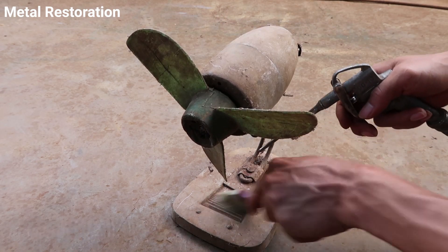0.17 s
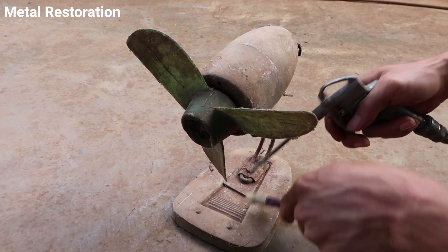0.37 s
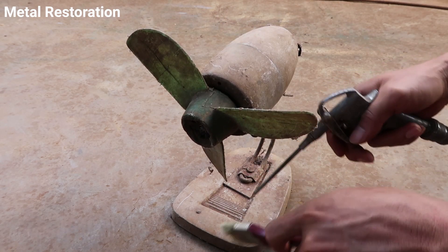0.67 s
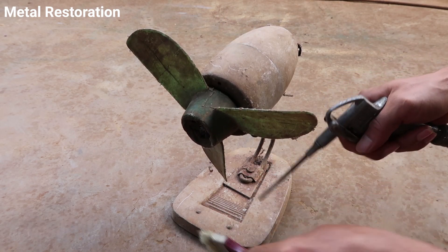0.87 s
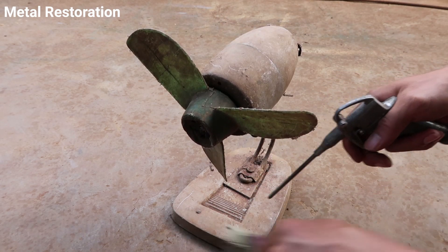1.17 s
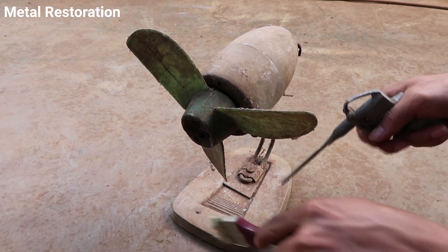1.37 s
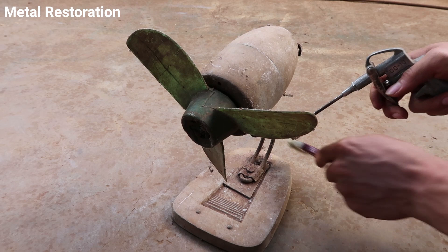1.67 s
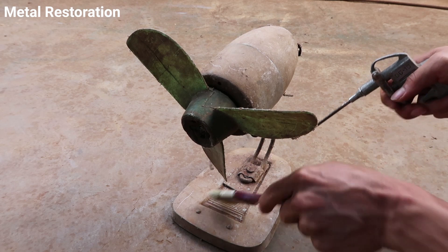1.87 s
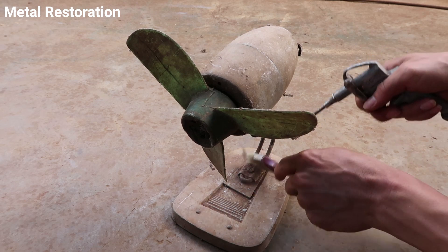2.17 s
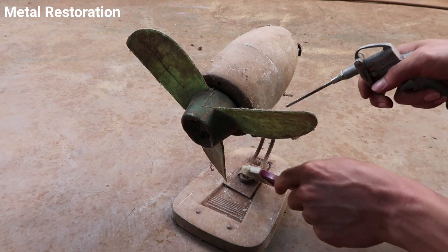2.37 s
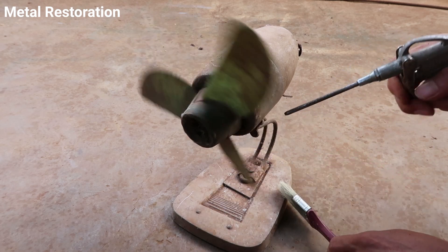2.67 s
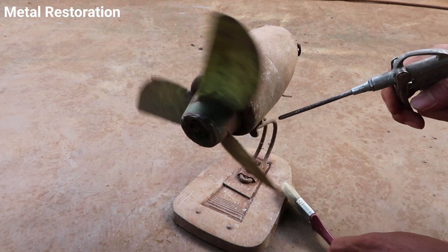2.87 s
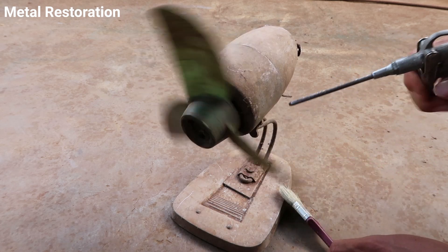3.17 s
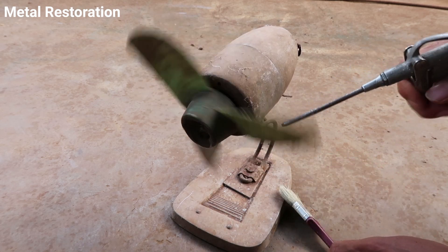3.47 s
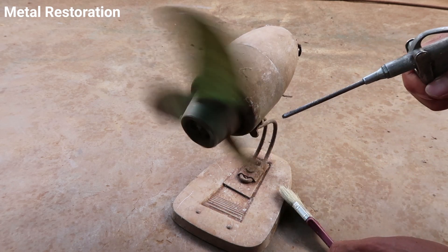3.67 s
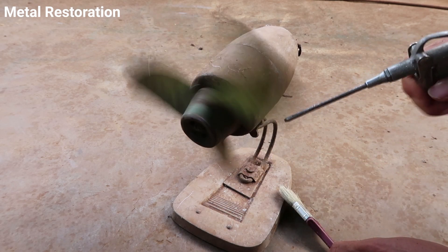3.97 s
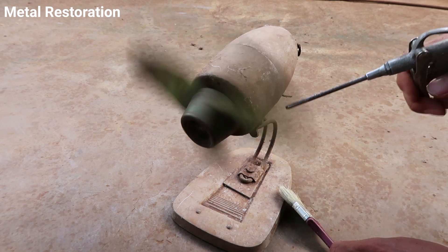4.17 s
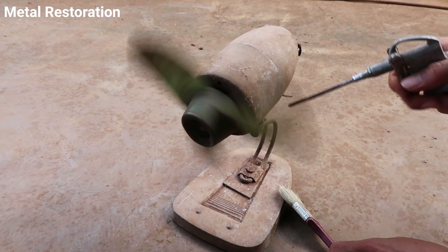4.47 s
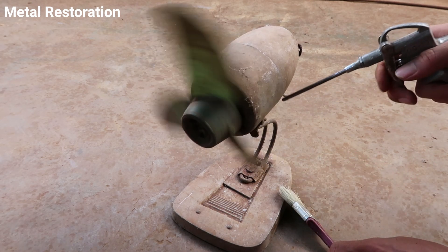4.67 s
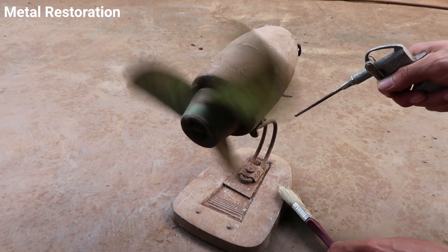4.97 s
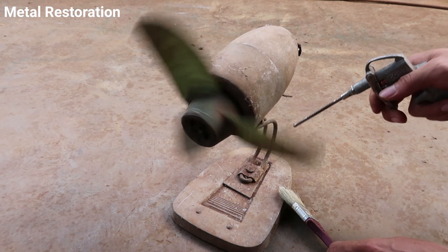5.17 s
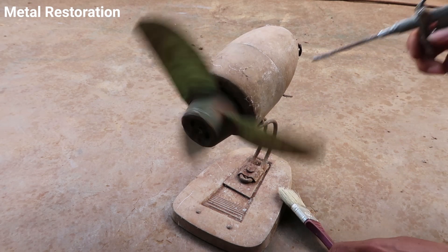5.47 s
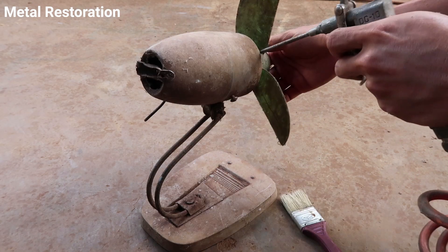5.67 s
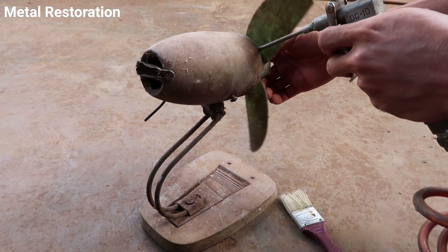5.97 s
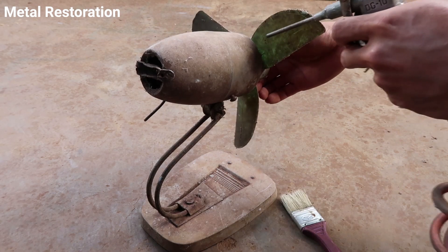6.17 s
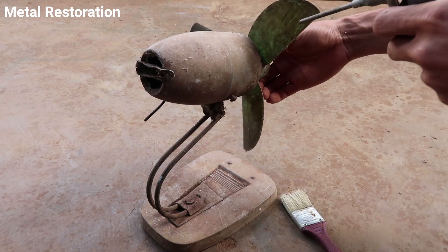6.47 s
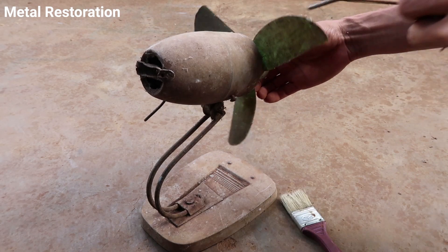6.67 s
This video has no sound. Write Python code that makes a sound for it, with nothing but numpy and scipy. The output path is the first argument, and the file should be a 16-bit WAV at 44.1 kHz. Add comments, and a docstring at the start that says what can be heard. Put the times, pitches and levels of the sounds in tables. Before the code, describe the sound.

Close to the microphone in a workshop, a blow gun puffs compressed air over an old metal fan in a steady run of sharp, hissing bursts, two of them a little longer. The air takes on hollow tones and brief whistles as it hits the metal. Just before the first burst, a brush scrapes softly and knocks on the fan's base. Distant engines rumble faintly underneath.

```python
"""A compressed-air blow gun puffs dust off an old metal fan on a workshop floor.
Each trigger pull pops the valve and lets out a turbulent, hissing jet that sings in the fan's
hollows and whistles on its edges. A brush rustles and knocks the cast base, once hard.
The shed echoes, over a low drone with far engines."""
import sys
import numpy as np
from scipy import signal
from scipy.fft import rfft, irfft, next_fast_len
from scipy.io import wavfile
from scipy.ndimage import uniform_filter1d

SR = 44100
rng = np.random.default_rng(int(sys.argv[2]) if len(sys.argv) > 2 else 0)


def transcribe(u):
    """Save the signal u as a 16-bit wav file named by the first command-line argument.

    u: samples, shape (n,) or (channels, n), limited to [-1, 1]; the rate is SR.
    q: integer samples, one column per channel.
    """
    v = np.clip(np.atleast_2d(u).T, -1, 1)
    q = np.round(v * 32767).astype(np.int16)
    wavfile.write(sys.argv[1], SR, q)


N = 300762

# Two microphone ports. Each row: frequency in Hz, then left-right coherence, left phase lead in
# radians or left-minus-right level in dB, respectively.
PORT_COHERENCE = [(60, 1), (180, .995), (550, .99), (1650, .95), (5000, .88), (9000, .8), (14000, .62)]
PORT_LEAD_RAD = [(0, 0), (4050, 0.28), (5000, 0.61), (6120, -0.46), (8010, -0.56), (8610, -0.75),
                 (9650, -1.43), (11600, -1.28), (12500, -0.3), (16000, -0.0)]
PORT_BALANCE_DB = [(130, 0), (250, -.6), (500, -2.8), (1000, -2.6), (2000, -1), (4000, -.4), (12000, -.2)]
# Noise spectra. Each row: frequency in Hz, relative density in dB.
RUMBLE_SPECTRUM_DB = [(15, -59.5), (25, -29.5), (43, -8), (112, -12.5), (150, -9.5), (207, -10.5),
                      (264, -31.5), (404, -19.5), (573, -28), (621, -16), (673, -29), (2070, -27.5),
                      (8000, -41), (15000, -56.5)]
BRISTLE_SPECTRUM_DB = [(180, -36), (400, -11), (800, -4), (1500, -12.5), (2200, -8.5), (3000, -12.5),
                       (4500, -23), (9000, -24.5), (12000, -35.5), (15000, -45.5)]
JET_SPECTRUM_DB = [(35, -47), (60, -17), (308, -16.5), (480, -7.5), (553, -16), (698, -21.5), (946, -15.5),
                   (2300, -12), (3120, -6.5), (5590, 0), (10300, -0.5), (14600, -14), (16000, -25)]
# Rumble envelope. Each row: time in seconds, level in dB.
RUMBLE_LEVEL_DB = [(0., -42), (.8, -53), (2.2, -51), (2.9, -54), (3.3, -49.5), (3.9, -60.5), (4.65, -53),
                   (5.5, -54), (6.3, -65), (6.82, -51)]
# Far engine tones. Each row: start and end in seconds, first and last pitch in Hz, crest level in dB.
ENGINE_TONES = [(0., .85, 172, 168.9, -45), (1.15, 2.3, 143.7, 140, -52.5), (1.6, 2.1, 173, 180.6, -51.5),
                (1.6, 3.7, 90.7, 84.7, -58.5), (2.8, 3.4, 150, 185.3, -52), (3., 3.7, 149.6, 144.3, -54),
                (3.9, 5.7, 82.2, 80.1, -54.5), (4.2, 5.1, 143.6, 142.2, -54.5),
                (5.9, 6.55, 156.4, 176.6, -58)]
# Shed echo. Each row: frequency in Hz, then T60 in seconds, coherence or colour in dB, respectively.
SHED_T60_S = [(250, 0.77), (660, 0.38), (1740, 0.39), (4590, 0.41), (12100, 0.33)]
SHED_COHERENCE = [(200, .99), (1000, .98), (4000, 1.), (12000, .2)]
SHED_COLOUR_DB = [(200, -8.5), (1500, -2.5), (6000, -5.), (14000, -1.5)]
# Modes of the cast base. Each row: frequency in Hz, level in dB, T60 in seconds.
BASE_MODES = [(424, -24, .22), (436, -27, .3), (690, -8, .035), (754, -14, .25), (785, -6, .13),
              (800, -2, .1), (880, -9, .035), (1040, -15, .07), (1415, -21, .1), (1440, -19, .16),
              (1790, -22, .1), (1818, -21, .16), (2126, -20, .1), (2923, -30, .06)]
# Brush knocks and grit ticks. Each row: time in seconds, gain in dB.
BRUSH_KNOCKS = [(.07, -39), (.2415, -36), (.3035, -6.5), (.429, -33.5)]
GRIT_TICKS = [(.242, -44.5), (.429, -56.5), (2.924, -31)]
# Bristles and hands. Each row: start in seconds, length in seconds, crest level in dB.
BRUSH_RUSTLES = [(0., 0.097, -43.5), (0.232, 0.035, -39.5), (0.267, 0.057, -41), (.35, 0.25, -52.5),
                 (1.19, .16, -53), (1.4, 0.11, -60), (1.872, 0.13, -51)]
# Fan resonances under the jet. Each row: centre in Hz, width in Hz, relative level in dB.
HOUSING_MODES = [(1322, 330, -1), (1389, 300, 0)]
HOLLOW_MODES = [(686, 190, -10.5), (775, 220, 6)]
SPLASH_MODES = [(530, 460, -19.5), (1778, 340, -6.5), (2250, 430, -1.5), (3490, 2140, 1)]
# Edge whistles. Each row: centre time and length in seconds, pitch and width in Hz, level in dB.
EDGE_WHISTLES = [(0.595, 0.065, 724, 150, -34), (0.661, 0.03, 2920, 700, -25), (.96, .13, 2330, 250, -27),
                 (2.05, 0.12, 4800, 2500, -20), (2.29, 0.07, 5300, 2000, -23),
                 (3.193, 0.054, 2420, 250, -22.5), (3.68, 0.051, 1350, 250, -23),
                 (3.69, 0.023, 2420, 300, -30), (3.837, 0.049, 1385, 250, -19.5),
                 (3.855, 0.032, 3660, 500, -20), (4.65, 0.065, 7200, 2500, -24),
                 (4.68, .1, 2300, 500, -25.5), (5.03, 0.053, 8700, 3000, -18.5),
                 (5.088, 0.041, 960, 500, -26.5), (5.39, 0.1, 4300, 1500, -20),
                 (5.442, 0.047, 940, 300, -26.5), (5.479, 0.0056, 6800, 2500, -14.5),
                 (5.489, 0.013, 6000, 5000, -21), (5.887, 0.11, 3140, 1100, -22),
                 (6.149, 0.047, 3300, 600, -20.5), (6.79, 0.009, 7760, 2500, -17.5)]
# Brief level changes of the hiss, mostly dips. Each row: centre time and length in seconds, gain in dB.
HISS_DIPS = [(3.657, 0.026, 0.5), (4.582, 0.041, -6.5), (4.75, .06, -2.5), (5.457, 0.03, -9),
             (6.115, .04, -7)]
# Trigger pulls. Each row: opening and shutting time in seconds; pop gain, treble gain and left-right
# balance in dB; then opening and shutting level in dB for jet, motor housing, base hollow and splash.
TRIGGER_PULLS = [(0.5165, .672, -14, -1, .1, -13, -19, -45, -31.5, -30, -31, -18.5, -27),
                 (.8712, 1.031, -19.5, 1.5, -0.042, -17, -25.5, -33, -31.5, -31.5, -26.5, -16.5, -22.5),
                 (1.4826, 1.641, -22.5, 0, 0, -17, -19.5, -55, -33.5, -41, -36.5, -32, -25.5),
                 (1.966, 2.106, -26.5, -3.5, 0.062, -17, -22.5, -25.5, -32, -24, -38.5, -22, -25),
                 (2.256, 2.395, -31, -4.5, .2, -14, -25, -39, -29.5, -38, -28.5, -25, -27),
                 (2.6177, 2.783, -26.5, 1, 0, -16, -27.5, -35, -36.5, -46, -34, -19, -30),
                 (3.0914, 3.295, -24, 0, 0, -20, -19.5, -22, -25.5, -32.5, -27, -21, -25),
                 (3.5815, 3.869, -27, -2, -.5, -17.5, -20.5, -29.5, -28, -40.5, -32.5, -21.5, -24.5),
                 (4.081, 4.284, -35, -.5, -0.36, -21.5, -22.5, -23, -32, -43.5, -29.5, -22.5, -26.5),
                 (4.578, 4.751, -31, -1, 0, -16, -20, -44, -39, -49, -46, -22.5, -25),
                 (4.993, 5.165, -26.5, 1.5, -.3, -19, -19, -47, -38, -35.5, -32.5, -32, -23.5),
                 (5.3399, 5.498, -30.5, -4, 0, -17, -20, -26.5, -42, -32.5, -35, -22.5, -30.5),
                 (5.7842, 5.954, -35, 2, -.3, -23, -26, -18.5, -26.5, -28, -34.5, -19.5, -25),
                 (6.108, 6.259, -41, -5, -.6, -17, -18.5, -23.5, -26.5, -32, -34, -23.5, -25),
                 (6.473, 6.808, -52, 4.5, -.5, -24.5, -23, -25.5, -26, -31, -27.5, -24, -23.5)]

TIME_S = np.arange(N) / SR
SNAP_S, LEAK_S, EMPTYING_DB_PER_S = .0076, .0024, 1084
SPURT_DB, SPURT_S = .9, .011  # stored pressure leaves first
JET_WAVER_DB, SONG_WAVER_DB = .8, 1.8  # unsteady aim
BOUNCE_GAIN, BOUNCE_S, BOUNCE_SWAY = .3, .0009, .25  # floor path, shifting with the hand
ECHO_DB, HUSH_S, HUSH_DB = -8.5, 5.678, -30
ENGINE_FADE_DB = -10
LOW_CUT_HZ, HIGH_CUT_HZ = 45., 15700


def amp(db):
    """Decibels to gain."""
    return 10 ** (np.asarray(db) / 20)


def unit_rms(x):
    """Scales to rms 1."""
    return x / np.sqrt(np.mean(x ** 2) + 1e-20)


def lookup(table, hz):
    """Interpolates on a log-frequency axis."""
    table_hz, value = np.transpose(table)
    return np.interp(np.log(hz + 1), np.log(table_hz + 1), value)


def swell(start_s, end_s):
    """Half-sine envelope."""
    return np.sin(np.interp(TIME_S, [start_s, end_s], [0, np.pi]))


def waver(smooth_s):
    """Slow random drift, rms 1."""
    size = round(smooth_s * SR)
    return unit_rms(uniform_filter1d(uniform_filter1d(rng.standard_normal(N), size), size))


def band(x, hz, width_hz):
    """One resonance, output rms 1."""
    return unit_rms(signal.lfilter(*signal.iirpeak(hz, hz / width_hz, SR), x))


def struck(events, shape):
    """One scaled copy of a shape per event."""
    train = np.zeros(N)
    for at_s, db in events:
        train[round(at_s * SR)] = amp(db)
    return signal.oaconvolve(train, shape)[:N]


def port_noise():
    """White noise as the two microphone ports hear it."""
    size = next_fast_len(N)
    hz = np.fft.rfftfreq(size, 1 / SR)
    left, other = rfft(rng.standard_normal((2, size)))
    coherence = lookup(PORT_COHERENCE, hz)
    right = coherence * left + np.sqrt(1 - coherence ** 2) * other
    right *= np.exp(-1j * lookup(PORT_LEAD_RAD, hz))
    balance = amp(lookup(PORT_BALANCE_DB, hz) / 2)
    return irfft(np.array([left * balance, right / balance]), size)[:, :N]


def coloured_noise(spectrum, frame, patch_db, flicker_db):
    """Shaped port noise with drifting spectral patches and broadband flicker, rms 1."""
    framing = dict(fs=SR, nperseg=frame, noverlap=frame * 3 // 4)
    hz, t, bins = signal.stft(port_noise(), **framing)
    patches = uniform_filter1d(rng.standard_normal(bins.shape[1:]), frame // 128, axis=0)
    patches = unit_rms(uniform_filter1d(patches, 4096 // frame, axis=1))
    flicker = unit_rms(uniform_filter1d(rng.standard_normal(len(t)), size=2))
    bins *= amp(lookup(spectrum, hz)[:, None] + patch_db * patches + flicker_db * flicker)
    return unit_rms(signal.istft(bins, **framing)[1][:, :N])


def drone():
    """Low rumble, and far engine tones that waver, swell and pass."""
    rumble = coloured_noise(RUMBLE_SPECTRUM_DB, frame=2048, patch_db=1.5, flicker_db=2.2)
    out = amp(np.interp(TIME_S, *np.transpose(RUMBLE_LEVEL_DB))) * rumble
    for start_s, end_s, first_hz, last_hz, db in ENGINE_TONES:
        hz = np.interp(TIME_S, [start_s, end_s], [first_hz, last_hz]) * (1 + .01 * waver(.05))
        near = swell(start_s, end_s)
        level = np.minimum(10 * near, 1) * amp(db + ENGINE_FADE_DB * (1 - near) + 2.5 * waver(.05))
        out += np.sqrt(2) * level * np.sin(2 * np.pi * np.cumsum(hz) / SR)
    return out


def shed_echo(x):
    """Sparse reflections, decaying per band; three sets crossfade steadily to avoid metallic ringing."""
    out, slots = 0, np.arange(300, SR - 20, 20)
    for k in range(3):
        taps = np.zeros((2, SR))
        arrivals = slots + rng.integers(0, 20, (2, len(slots)))
        np.put_along_axis(taps, arrivals, rng.choice([-1., 1.], arrivals.shape), 1)
        hz, t, bins = signal.stft(taps, SR, nperseg=256)
        hz = hz[:, None]
        coherence = lookup(SHED_COHERENCE, hz)
        bins[1] = coherence * bins[0] + np.sqrt(1 - coherence ** 2) * bins[1]
        bins[1] *= np.exp(-1j * lookup(PORT_LEAD_RAD, hz))
        bins *= amp(lookup(SHED_COLOUR_DB, hz) - 60 * t / lookup(SHED_T60_S, hz))
        tail = signal.istft(bins, SR, nperseg=256)[1]
        tail = tail[:, :SR * 2 // 3] / np.linalg.norm(tail[0])
        share = np.sqrt(2 / 3) * np.cos(6 * np.pi * TIME_S + k * np.pi / 3)
        out = out + signal.oaconvolve((share * x.mean(0))[None], tail, axes=1)[:, :N]
    return out


def echo_hush():
    """Echo gain: drops from HUSH_S until the next pull."""
    next_pull_s = min(opens_s for opens_s, *_ in TRIGGER_PULLS if opens_s > HUSH_S)
    hushed = (TIME_S > HUSH_S) & (TIME_S < next_pull_s)
    return uniform_filter1d(amp(HUSH_DB * hushed), size=400)


def brush():
    """Knocks ring the cast base, grit ticks, bristles rustle in clumps."""
    t = np.arange(SR // 2) / SR
    ring = sum(amp(db - 60 * t / t60_s) * np.sin(2 * np.pi * hz * t) for hz, db, t60_s in BASE_MODES)
    clatter = amp(-22.5 - 60 * t / .056) * band(rng.standard_normal(len(t)), 3000, 2700)  # handle, ferrule
    knock = (ring + clatter) * (1 - np.exp(-t / .0012))
    tick = band(band(rng.standard_normal(400), 5500, 4000), 5500, 6000) * np.exp(-t[:400] / .003)
    hits = struck(BRUSH_KNOCKS, knock) * amp([[-1.7], [1.7]]) + struck(GRIT_TICKS, tick)
    rustle = sum(amp(db) * swell(at_s, at_s + length_s) for at_s, length_s, db in BRUSH_RUSTLES)
    return hits + rustle * coloured_noise(BRISTLE_SPECTRUM_DB, frame=256, patch_db=2.5, flicker_db=3.)


def valve_pops():
    """One push of released pressure per pull, then its rebound."""
    t = np.arange(-200, 1200) / SR
    pop = -np.exp(-(t / .00082) ** 2) + .55 * np.exp(-((t - .003) / .0026) ** 2)
    pops = struck([(opens_s, pop_db) for opens_s, _, pop_db, *_ in TRIGGER_PULLS], pop)
    return np.roll(pops, -165)  # push peaks just after opening


def airflow():
    """Gate, 0 to 1: air leaks just ahead of the pop, snaps on, dies as the tube empties."""
    flow = np.zeros(N)
    for opens_s, shuts_s, *_ in TRIGGER_PULLS:
        opening = np.clip((TIME_S - opens_s + LEAK_S) / SNAP_S, 0, 1) ** 2
        flow += opening * amp(-EMPTYING_DB_PER_S * np.maximum(TIME_S - shuts_s, 0))
    return flow


def edge_whistles():
    """The jet crosses an edge or blade: short swells of resonant noise."""
    noise, out = port_noise(), np.zeros((2, N))
    for at_s, length_s, hz, width_hz, db in EDGE_WHISTLES:
        span = slice(round((at_s - 2 * length_s) * SR), round((at_s + 2 * length_s) * SR))
        level = amp(db) * np.exp(-(2 * (TIME_S[span] - at_s) / length_s) ** 2)
        out[:, span] += level * band(band(noise[:, span], hz, width_hz), hz, 2 * width_hz)
    return out


def fan_song(modes):
    """Air noise drives fan resonances of alternating sign."""
    noise = port_noise()
    return unit_rms(sum((-1) ** k * amp(db) * band(noise, hz, width_hz)
                        for k, (hz, width_hz, db) in enumerate(modes)))


def jet_hiss(treble_db):
    """Turbulent hiss plus its floor bounce; the nozzle's aim sets the treble."""
    direct = coloured_noise(JET_SPECTRUM_DB, frame=512, patch_db=1.8, flicker_db=1.)
    delay_s = BOUNCE_S * (1 + BOUNCE_SWAY * np.tanh(waver(.12)))
    bounce = np.array([np.interp(TIME_S - delay_s, TIME_S, side) for side in direct])
    hiss = unit_rms(direct + BOUNCE_GAIN * bounce)
    treble = signal.filtfilt(*signal.butter(2, 8000., "high", fs=SR), hiss)
    return hiss + (amp(treble_db) - 1) * treble


def blow_gun():
    """The jet hisses, sings in hollows, splashes on metal and whistles while air flows."""
    columns = np.transpose(TRIGGER_PULLS)
    pull = np.maximum(np.searchsorted(columns[0] - .015, TIME_S) - 1, 0)  # row switches 15 ms early
    opens_s, shuts_s, _, treble_db, pan_db, *levels_db = columns[:, pull]
    since_s = TIME_S - opens_s
    progress = np.clip(since_s / (shuts_s - opens_s), 0, 1)
    jet_db, *songs_db = (first + (last - first) * progress
                         for first, last in zip(levels_db[::2], levels_db[1::2]))
    dip_db = sum(db * np.exp(-(2 * (TIME_S - at_s) / length_s) ** 2) for at_s, length_s, db in HISS_DIPS)
    spurt_db = SPURT_DB * np.exp(-np.maximum(since_s, 0) / SPURT_S)
    air = jet_hiss(treble_db) * amp(jet_db + dip_db + spurt_db + JET_WAVER_DB * waver(.03))
    for db, modes in zip(songs_db, [HOUSING_MODES, HOLLOW_MODES, SPLASH_MODES]):
        air += amp(db + SONG_WAVER_DB * waver(.03)) * fan_song(modes)
    return airflow() * (air * amp([pan_db / 2, -pan_db / 2]) + edge_whistles())


def scene():
    """Near sources, their echo and the drone."""
    near = blow_gun() + valve_pops() + brush()
    return near + amp(ECHO_DB) * echo_hush() * shed_echo(near) + drone()


def record(dry):
    """Microphone bass roll-off, then the band limit."""
    thin = signal.lfilter(*signal.butter(2, LOW_CUT_HZ, "high", fs=SR), dry)
    lowpass = signal.firwin(511, HIGH_CUT_HZ, window=("kaiser", 9), fs=SR)
    return signal.oaconvolve(thin, lowpass[None], "same")


dry = scene()
out = record(dry)
transcribe(out)
```